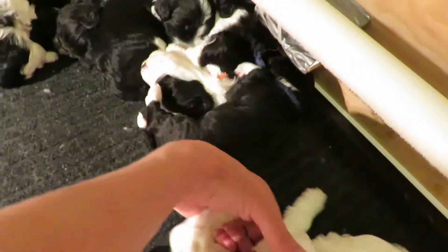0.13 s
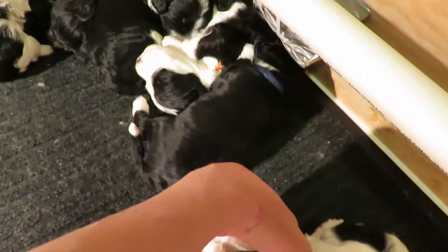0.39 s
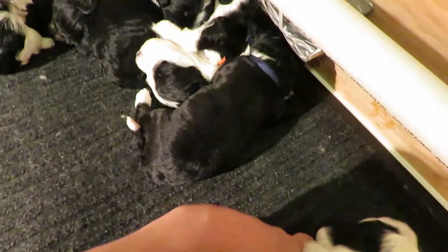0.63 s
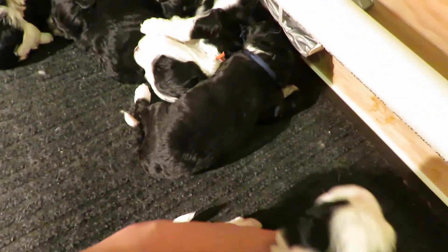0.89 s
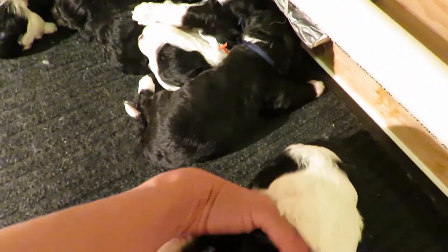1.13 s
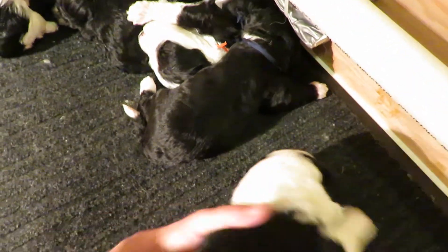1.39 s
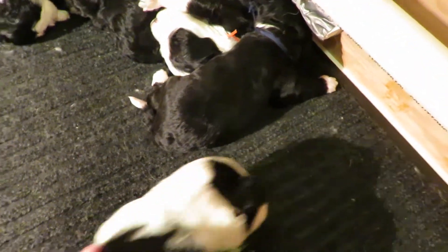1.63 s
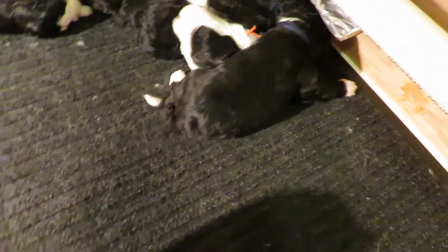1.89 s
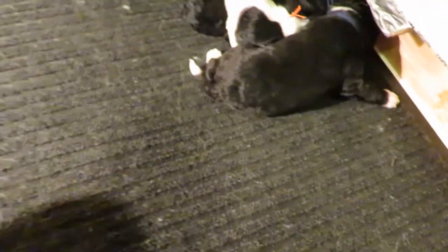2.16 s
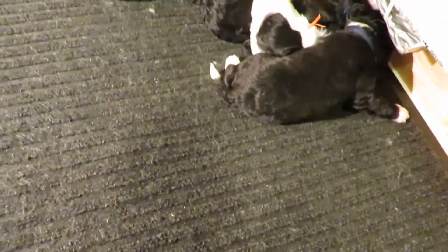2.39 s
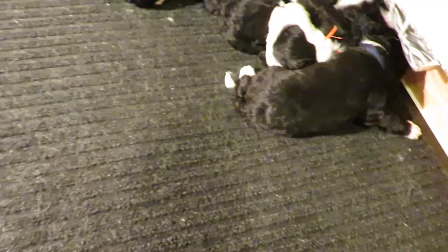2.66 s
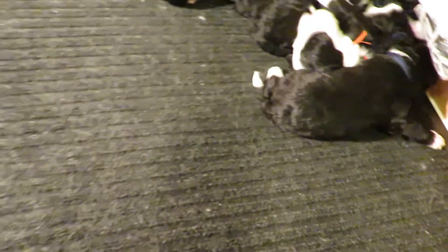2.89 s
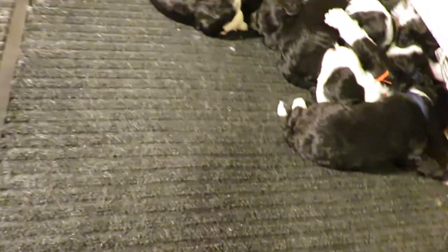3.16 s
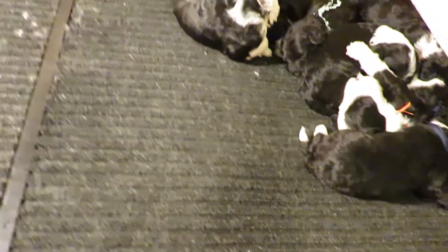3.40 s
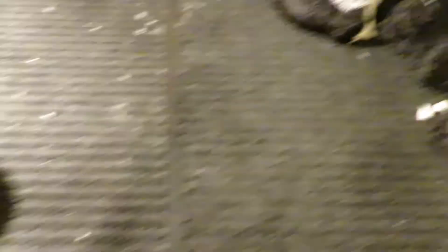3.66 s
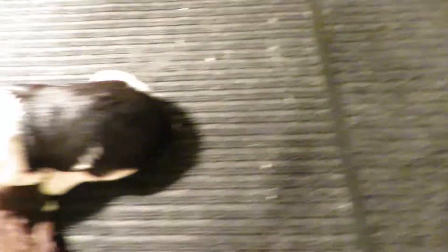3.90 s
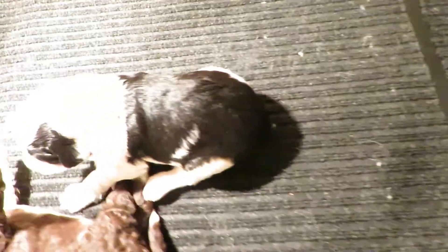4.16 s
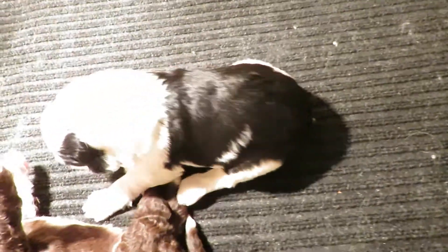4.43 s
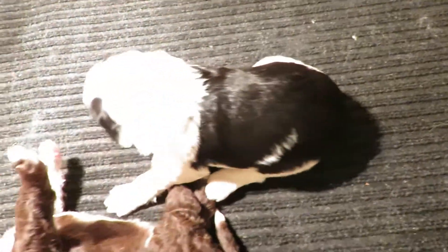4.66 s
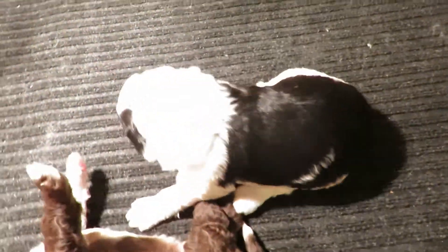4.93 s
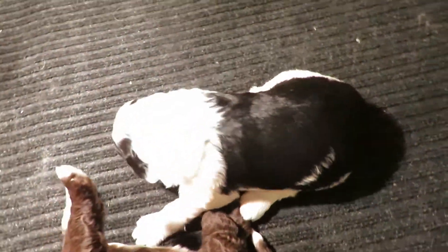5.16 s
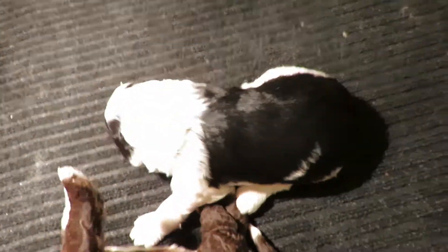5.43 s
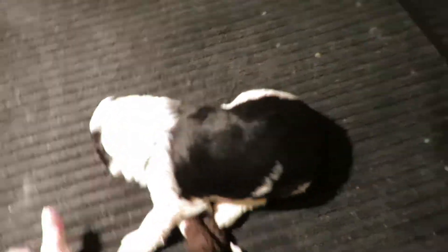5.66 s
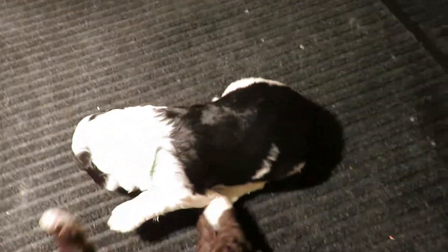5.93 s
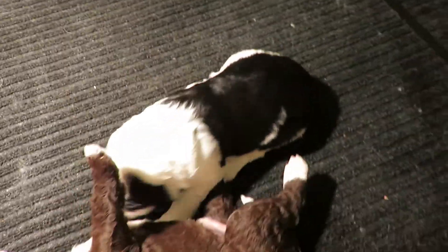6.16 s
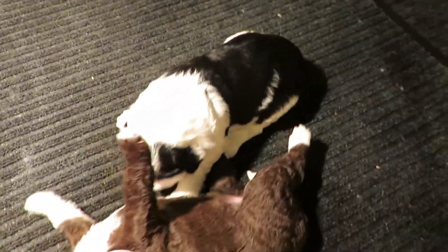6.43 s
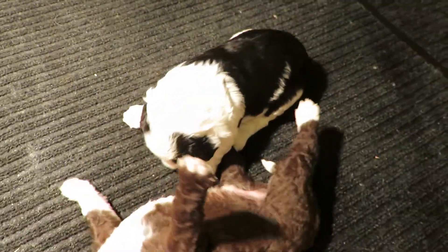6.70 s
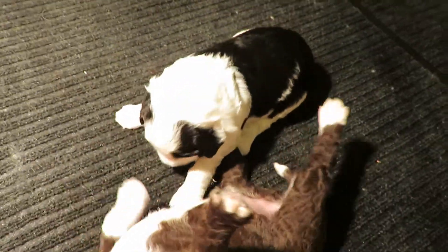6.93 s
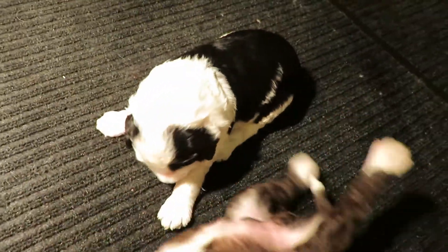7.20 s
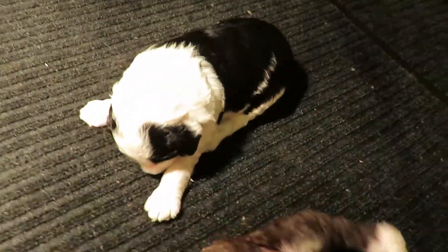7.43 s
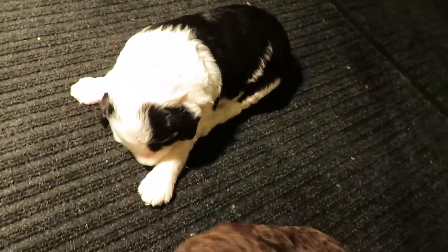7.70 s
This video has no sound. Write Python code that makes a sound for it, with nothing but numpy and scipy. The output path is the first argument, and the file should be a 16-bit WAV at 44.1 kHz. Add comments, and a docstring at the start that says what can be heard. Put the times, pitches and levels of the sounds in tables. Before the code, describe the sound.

Irregular hollow wooden knocks and thumps, soft fur rubbing and tiny claw ticks in a quiet humming room, close up.

```python
"""A wooden whelping box in a quiet room: an appliance hums near the mains rate, as steady sines over noise.
Fur and cloth drag over the ribbed mat and a sleeve rustles, as grainy noise; claws and cloth tick.
Knees, hands and puppies bump the boards, faintly, then firmly from 1.2 s: pushes and rattle excite modes.
An airy whistle swells by 2.9 s, a rub sounds a hollow note at 3.4 s, and the hardest blows fall
from 3.7 to 4.4 s. Bumps and scuffs go on from 5.4 to 6.8 s, then fade; a faint hollow rub comes at 7.6 s."""
import sys
import numpy as np
from scipy import signal
from scipy.fft import rfft, irfft, next_fast_len
from scipy.io import wavfile

SR = 44100
rng = np.random.default_rng(int(sys.argv[2]) if len(sys.argv) > 2 else 0)


def pcm_store(signal):
    """Save signal as 16-bit PCM."""
    levels = np.round(np.clip(np.atleast_2d(signal), -1, 1) * 32767)
    wavfile.write(sys.argv[1], SR, levels.astype(np.int16).T)


def attenuation_scalar(level_db):
    """Turn a level in dB into a linear amplitude multiplier (20 dB per decade)."""
    decades = np.asarray(level_db, float) / 20
    return 10 ** decades


N = 344862

# Width of diffuse sound at two close microphones: (frequency [Hz], side against mid [dB])
STEREO_WIDTH = [(60, -16), (110, -25), (200, -14), (380, -10.5), (700, -16), (1290, -7.5), (2380, -1),
                (4400, 3.5), (8120, 8.5), (15000, 18)]

# Colour of the room's noise: (frequency [Hz], relative density [dB per Hz])
ROOM_COLOUR = [(12, -35), (20, 3), (74, -5.5), (126, -3.5), (145, -14), (176, -9.5), (232, -10.5),
               (334, -11.5), (429, -9), (582, -22.5), (1110, -16.5), (1460, -22.5), (5720, -46.5),
               (12500, -81.5), (15600, -89.5)]
# Colour of the room tone that differs between the microphones: (frequency [Hz], relative density [dB per Hz])
AIR_COLOUR = [(88, -34.5), (150, -10.5), (366, -6.5), (404, -4.5), (509, -10.5), (827, -12.5), (948, -13),
              (1290, -14), (15500, -36)]
ROOM_DB, AIR_DB = -45, -54.5

# Mains and motor lines of the appliance: (frequency [Hz], level [dB])
HUM_TONES = [(44.8, -13), (59.4, -6), (120, 0), (146.4, -19), (240, -18)]
HUM_START_DB, HUM_RISE_DB_PER_S = -43.2, 0.25

# Weight shifting on the boards:
# (peak time [s], rise over 20 dB [s], fall over 20 dB [s], murmur [dB], floor rumble against murmur [dB])
WEIGHT_SHIFTS = [(0.15, 1.5, 1.1, -48, -4), (1.3, .3, .5, -54, 0), (1.61, .3, .4, -50, 6),
                 (1.74, .4, .8, -44, -10), (2.15, .4, .5, -45, -7), (2.87, 1.2, 1.2, -46, -15),
                 (3.12, .15, .3, -45, -12), (3.28, .2, .2, -38, -8), (3.46, .25, .2, -28, -14),
                 (3.66, .3, .3, -45, 8), (3.79, .2, .15, -41, -10), (3.97, .15, .15, -48, 8),
                 (4.34, .08, .12, -26, -5), (4.55, .3, .12, -36, -6), (4.68, .2, .4, -43, -8),
                 (5.35, .9, .3, -47, -12), (5.65, .4, .3, -39, -4), (5.84, .3, .25, -35, -4),
                 (6.12, .5, .4, -46, 8), (6.3, .3, .8, -42, -3), (6.58, .5, .4, -41, 9),
                 (6.72, .2, .25, -46, 8), (7.34, .6, .4, -54, 0), (7.67, .2, .3, -49, 2),
                 (7.82, .2, .2, -43, -10)]
REST_MURMUR_DB, REST_RUMBLE_DB = -62, -68
# Colour of the floor rumble: (frequency [Hz], relative density [dB per Hz])
RUMBLE_COLOUR = [(25, -36), (45, 2), (75, -1), (105, -2.5), (160, -21), (300, -61.5)]
# Ringing modes of the wooden box: (frequency [Hz], level [dB], decay by 60 dB [s])
BOX_MODES = [(63.5, -2.5, 0.13), (96.4, 6.5, .3), (131, 1, 0.19), (166.5, -2.5, 0.22), (188.8, -6, 0.29),
             (206.8, 1.5, 0.29), (245, -6, 0.29), (291.8, 1, 0.16), (305, 3, 0.12), (338.7, -2, 0.072),
             (364.8, -7, 0.33), (400.8, 1, 0.056), (445.4, 3, 0.057), (508.2, 2, 0.051), (603.5, 0, 0.14),
             (656.6, 4, 0.039), (724, 6.5, 0.04), (843, -2.5, 0.058), (960, -5.5, 0.022),
             (1099, -10.5, 0.075), (1224, -3.5, 0.015), (1416, -8, 0.064), (1718, -1, 0.034),
             (2030, -8, 0.027), (2365, -5.5, 0.01), (3106, -12.5, 0.014), (4160, -23, 0.0091)]

# Fur and cloth stroking the ribs:
# (peak time [s], rise over 20 dB [s], fall over 20 dB [s], level [dB], brightness [dB])
FUR_STROKES = [(0.09, .6, .8, -53, 0), (0.28, .4, .4, -54, -1), (0.49, .08, .2, -51, 10),
               (0.95, .1, .4, -57, 0), (1.28, .04, .3, -52, -2), (1.33, .1, .2, -55, -3),
               (1.65, .25, 1.2, -51.5, 0), (1.93, .5, .7, -52, 0), (2.18, .3, .2, -50, -6),
               (2.24, .06, .18, -44.5, 0), (2.88, 1.1, .6, -48.5, 4), (3.14, .08, .2, -57, -10),
               (3.235, .15, .05, -46, 7), (3.4, .25, .1, -37, -2), (3.455, .12, .15, -30, 4),
               (3.64, .12, .12, -48, -8), (3.705, .03, .05, -48, 8), (3.78, .3, .7, -56, 2),
               (4.17, .06, .05, -54, 3), (4.55, .3, .4, -54, 0), (5.14, .15, .15, -60, -13),
               (5.235, .07, .4, -45, 3), (5.31, .2, .25, -44.5, 3), (5.55, .2, .3, -51, 0),
               (5.73, .12, .1, -38.5, 3), (5.78, .05, .12, -37, 6), (5.89, .15, .16, -41, -2),
               (5.96, .15, .14, -45, 6), (6.2, .3, .4, -59, -3), (6.55, .6, .7, -60, -4),
               (7.22, .07, .65, -49.5, 2), (7.6, .12, .2, -57, -8), (7.72, .2, .3, -57, 0),
               (7.82, .03, .1, -63, -17)]
# Paws and knees skidding abruptly: (peak time [s], fall over 20 dB [s], level [dB], brightness [dB])
PAW_SKIDS = [(3.27, .15, -37, 7), (4.31, .13, -38, 8), (6.816, .23, -37.5, 4)]
# Colours of bright, dull and fine scuff: (frequency [Hz], relative density [dB per Hz])
BRIGHT_SCUFF_COLOUR = [(900, -26), (1500, 2.5), (1700, 4), (2500, 1), (3400, -5), (4300, -12.5),
                       (5000, -22.5), (9000, -66)]
DULL_SCUFF_COLOUR = [(250, -23), (500, 6), (900, 3), (1080, 1.5), (1200, -0.5), (1300, 1.5), (1500, -4.5),
                     (2500, -15), (5000, -76.5)]
FINE_SCUFF_COLOUR = [(2000, -24), (3300, 0.5), (4200, -1.5), (5200, -2), (7000, -9.5), (11000, -20.5),
                     (16000, -30)]
# Bright strokes trade dull scuff for fine; FINE_SHARE is dB of fine scuff per dB of brightness
DULL_DB, FINE_DB, FINE_SHARE, REST_SCUFF_DB = 3.0, -7.5, 0.3, -66
# A skid is heavy: less fine scuff than a stroke
SKID_RISE_S, SKID_FINE_DB = 0.012, -11
# Each blow slaps the mat: level against its crack, rise and fall over 20 dB, then a longer tail
SLAP_DB, SLAP_RISE_S, SLAP_FALL_S, SLAP_BRIGHT_DB = -2, 0.003, 0.035, -14
SLAP_TAIL_DB, SLAP_TAIL_S = -11, 0.26

# A sleeve brushing past: (peak time [s], rise over 20 dB [s], fall over 20 dB [s], level [dB])
SLEEVE_BRUSHES = [(0.0, .1, .6, -57.5), (0.15, .2, .2, -60), (0.39, .12, .07, -55.5), (0.5, .08, .2, -50),
                  (1.04, .7, .7, -63), (1.2, .2, .15, -62), (1.32, .3, .05, -57), (1.5, .03, .04, -49),
                  (1.63, .1, .6, -62), (1.76, .6, .16, -58), (2.09, .15, .05, -55), (2.24, .12, .22, -52.5),
                  (2.48, .07, .35, -64.5), (2.74, .09, .15, -62.5), (2.85, .15, .11, -62),
                  (2.99, .02, .03, -60), (3.07, .05, .1, -61), (3.13, .04, .1, -59), (3.41, .5, .1, -55),
                  (3.46, .1, .09, -51), (3.61, .15, .3, -59), (3.68, .2, .12, -59), (3.9, .3, .6, -70),
                  (4.15, .3, .3, -71), (4.42, .03, .07, -54), (4.66, .1, 1.2, -68), (5.12, .15, .07, -71),
                  (5.24, .08, .3, -64), (5.31, .3, .27, -59), (5.74, .1, .055, -43), (5.92, .07, .2, -51),
                  (5.97, .1, .08, -51), (6.36, .15, .12, -64), (6.49, .12, .06, -63), (6.83, .1, .08, -65),
                  (7.0, .15, .2, -68), (7.25, .6, 1.5, -68), (7.67, .7, .7, -73)]
# Colour of the sleeve's rustle: (frequency [Hz], relative density [dB per Hz])
RUSTLE_COLOUR = [(4000, -3), (6000, -2.5), (8000, -5), (12000, -7), (15500, -8), (17000, -44)]
REST_RUSTLE_DB = -85

# An airy whistle: (peak time [s], rise over 20 dB [s], fall over 20 dB [s], level [dB])
WHISTLE_SWELLS = [(0.25, 1.5, .8, -59), (2.85, .8, .5, -53), (3.62, .2, .5, -56)]
# Narrow bands of the whistle: (frequency [Hz], level [dB], decay by 60 dB [s])
WHISTLE_MODES = [(2210, 0, .022), (3235, -8, .015), (3620, -6, .012), (4580, -9, .013), (5240, -8, .012)]

# Blows on the boards: (time [s], level [dB], deep boom [dB], upper boards [dB], crack [dB]);
# the last three stand against the level
BOARD_BLOWS = [(0.081, -47.5, -14, 17, -3), (0.119, -49, 4, 10, 2), (0.877, -56.5, 8, 20, -12),
               (1.232, -28, 2, 6, -32), (1.26, -38, 1, -8, -21), (1.313, -40, -4, 2, 0),
               (1.499, -28.5, -15, -14, 4), (1.513, -22.5, -7, -2, -28), (1.558, -31, -13, -2, -30),
               (1.704, -39, 3, 4, -12), (2.079, -40, 1, -3, -6), (2.097, -37, 3, 6, -16),
               (2.116, -31, -10, 5, -14), (2.139, -41, -12, 7, -3), (2.179, -44, -9, 9, -1),
               (3.271, -33, -4, -7, -13), (3.72, -7.5, -23.5, -13, -26), (3.769, -32, -4, 3, -16),
               (3.831, -41, 3.5, 4, -11.5), (3.927, -19.5, -14, -1.5, -22), (3.984, -41, -14, -15, -13),
               (4.188, -15, -15, -6, -15), (4.244, -2.5, -34, -12, -24), (4.266, -14, -13, -16, -22),
               (4.301, -18.5, -8.5, -4, -16), (4.378, -16, -8, -4, -11.5), (4.387, -11.5, -9, -1, -5),
               (4.413, -36, -11, -15, -14), (4.446, -24, -10, 1, -4), (4.469, -31.5, -10, 12, -14),
               (4.529, -41.5, 3, -5, -8), (5.053, -47, -8, 17, -8), (5.441, -16.5, -0.5, -2, -15),
               (5.477, -11.5, -14, -8, -12), (5.493, -33, 11, -5, -22), (5.758, -14, -20, 2, -3),
               (5.767, -9, -17, -18, -5), (5.801, -24, -2, -4, -3), (5.881, -18.5, -9, 3, -11),
               (5.949, -37, -2, -11, -10), (6.094, -18, -15.5, -1, -22), (6.14, -31, -11, -8, -23),
               (6.302, -16.5, -24, -5.5, -36), (6.481, -23.5, -12, -5, -32), (6.511, -30, 8, -20, -22),
               (6.577, -31.5, 5.5, -21, -22), (6.653, -34, -5, 3, -12), (6.684, -29, -10.5, -16, -30),
               (6.811, -43, 5, 8, -4), (7.355, -45, 13, -8, -5), (7.399, -51, 2, -1, -5),
               (7.771, -45, 11, -6, -4)]
# Where deep boom, level, upper boards and crack apply: (frequency [Hz])
BLOW_ANCHORS = [100, 205, 305, 1600]
# The contact starts before the boom peaks; contact and rattle times hold at 200 Hz
LEAD_S, CONTACT_S, RATTLE_S, RATTLE_DB = 0.003, 0.0035, 0.029, -2.5
ECHO_T60_S, ECHO_DB, ECHO_SIDE_DB = 0.41, -8.5, -22.5

# Small ticks of claws and cloth: (time [s], level [dB], pitch [Hz])
CLAW_TICKS = [(0.145, -34, 4560), (0.377, -38, 10800), (0.401, -34, 12200), (0.496, -38, 11000),
              (0.7916, -54, 9000), (0.9396, -54, 9000), (1.277, -41, 6000), (1.289, -38, 5500),
              (1.316, -38, 5600), (1.331, -41, 5560), (1.497, -34, 5000), (1.507, -29.5, 5200),
              (1.983, -46, 9000), (2.079, -42, 5000), (2.226, -38, 8000), (2.26, -42, 10000),
              (2.277, -34.5, 11000), (2.302, -39, 11000), (2.7526, -33.5, 5500), (2.994, -38, 7500),
              (3.128, -55, 8000), (3.574, -44, 11500), (3.5795, -37, 10000), (3.6, -42, 10500),
              (3.61, -41.5, 11000), (3.62, -39.5, 11600), (3.674, -46, 8500), (3.6985, -26, 3440),
              (4.308, -44, 4000), (4.414, -44, 8100), (4.526, -46, 5830)]

# Rubs that set a hollow note of the box sounding:
# (peak time [s], rise over 20 dB [s], fall over 20 dB [s], level [dB])
HOLLOW_RUBS = [(3.425, .025, .11, -29), (7.615, .04, .12, -42)]
# Modes of the hollow note: (frequency [Hz], level [dB], decay by 60 dB [s])
HOLLOW_NOTE = [(1080, 2, 0.053), (1230, -2, 0.055), (1950, -12, .02)]


def rms_one(x):
    """Scale to unit rms."""
    return x / np.sqrt(np.mean(x ** 2) + 1e-20)


def colour(x, points):
    """Colour without phase shift by a spectrum drawn in dB over log frequency."""
    size = next_fast_len(len(x))
    hz = np.maximum(np.arange(size // 2 + 1) * SR / size, 1)
    point_hz, point_db = np.transpose(points)
    gain_db = np.interp(np.log(hz), np.log(point_hz), point_db)
    return irfft(rfft(x, size) * attenuation_scalar(gain_db), size)[:len(x)]


def drift(rate):
    """Slow random wander: straight lines between random knots, `rate` knots a second."""
    knots = rng.standard_normal(800)
    return np.interp(np.arange(N) * rate / SR, np.arange(800), knots)


def ring(x, hz, t60):
    """A damped resonator: a unit click sets a sine of height 1 ringing."""
    radius = attenuation_scalar(-60 / (t60 * SR))
    angle = 2 * np.pi * hz / SR
    poles = [1, -2 * radius * np.cos(angle), radius * radius]
    return signal.lfilter([0, np.sin(angle)], poles, x + 1e-18)


def spread(mid, other, side_db):
    """Left and right from a mid signal and another whose treble makes the width."""
    side = attenuation_scalar(side_db) * colour(other, STEREO_WIDTH)
    return np.array([mid + side, mid - side])


def grains(grit_db):
    """Noise whose samples have uneven sizes, as fibres catching and letting go."""
    size_db = grit_db * np.minimum(rng.exponential(1, N), 5)
    return rms_one(rng.standard_normal(N) * attenuation_scalar(size_db))


def swells(s, rise_s, fall_s, peak_db, rest_db):
    """Level in dB of events with straight dB slopes, their powers added to a resting level."""
    t = np.arange(0, N + 44, 44) / SR   # one point every 44 samples
    late = t - s[:, None]
    drop = np.maximum(-late / np.c_[rise_s], late / np.c_[fall_s])
    db = (peak_db + 0 * s)[:, None] - 20 * drop
    power = np.sum(attenuation_scalar(2 * np.maximum(db, -200)), axis=0) + attenuation_scalar(2 * rest_db)
    return np.interp(np.arange(N) / SR, t, 10 * np.log10(power))


def friction(spectrum, level_db, grit_db, flicker_db, side_db):
    """Grainy rubbing, flickering as the stroke catches."""
    gain = attenuation_scalar(level_db + flicker_db * drift(30))
    mid, other = (gain * rms_one(colour(grains(grit_db), spectrum)) for _ in range(2))
    return spread(mid, other, side_db)


def room_tone():
    """Steady air and microphone hiss over a low motor rumble, all coloured noise."""
    mid = attenuation_scalar(ROOM_DB) * rms_one(colour(rng.standard_normal(N), ROOM_COLOUR))
    side = attenuation_scalar(AIR_DB) * rms_one(colour(rng.standard_normal(N), AIR_COLOUR))
    return np.array([mid + side, mid - side])


def hum():
    """Mains and motor lines as sines, each wavering a little while all slowly rise."""
    t = np.arange(N) / SR
    tones = np.zeros(N)
    for hz, db in HUM_TONES:
        tones += attenuation_scalar(db + 0.51 * drift(4.4)) * np.sin(2 * np.pi * hz * t)
    return np.sqrt(2) * attenuation_scalar(HUM_START_DB + HUM_RISE_DB_PER_S * t) * tones


def floor_rumble():
    """Shifting weight makes the floor rumble: low noise that swells with each lean."""
    s, rise_s, fall_s, murmur_db, deep_db = np.transpose(WEIGHT_SHIFTS)
    level_db = swells(s, rise_s, fall_s, murmur_db + deep_db, REST_RUMBLE_DB)
    return friction(RUMBLE_COLOUR, level_db, grit_db=0.5, flicker_db=-1.5, side_db=-15.0)


def boards_dragged():
    """Uneven friction under shifting weight keeps the lower modes murmuring."""
    s, rise_s, fall_s, murmur_db, _ = np.transpose(WEIGHT_SHIFTS)
    weight_db = swells(s, rise_s, fall_s, murmur_db, REST_MURMUR_DB)
    rub = grains(3.1) * attenuation_scalar(2.9 * drift(25))
    murmur = sum(attenuation_scalar(level_db) * ring(rub, hz, t60) for hz, level_db, t60 in BOX_MODES[3:14])
    return attenuation_scalar(weight_db) * rms_one(murmur)


def scuffing():
    """Strokes, skids and the slaps of blows rub the mat, heard as bright, dull and fine scuff."""
    skids = [(s, SKID_RISE_S, fall_s, db, bright_db) for s, fall_s, db, bright_db in PAW_SKIDS]
    s, rise_s, fall_s, db, bright_db = np.transpose(list(FUR_STROKES) + skids)
    heavy_db = SKID_FINE_DB * (np.arange(len(s)) >= len(FUR_STROKES))

    hit_s, hit_db, _, _, crack_db = np.transpose(BOARD_BLOWS)
    slap_db = hit_db + crack_db + SLAP_DB
    slap = swells(hit_s, [SLAP_RISE_S], [SLAP_FALL_S], slap_db, -200)
    tail = swells(hit_s, [SLAP_RISE_S], [SLAP_TAIL_S], slap_db + SLAP_TAIL_DB, -200)
    slap_power = attenuation_scalar(2 * slap) + attenuation_scalar(2 * tail)

    bright_power = attenuation_scalar(2 * swells(s, rise_s, fall_s, db, REST_SCUFF_DB))
    bright_power += slap_power * attenuation_scalar(2 * SLAP_BRIGHT_DB)
    dull_db = swells(s, rise_s, fall_s, db + DULL_DB - bright_db, REST_SCUFF_DB + DULL_DB)
    dull_power = attenuation_scalar(2 * dull_db) + slap_power
    fine_peak_db = db + FINE_DB + FINE_SHARE * bright_db + heavy_db
    fine_db = swells(s, rise_s, fall_s, fine_peak_db, REST_SCUFF_DB + FINE_DB)

    bright = friction(BRIGHT_SCUFF_COLOUR, 10 * np.log10(bright_power), grit_db=4.0, flicker_db=1.06, side_db=-9.0)
    dull = friction(DULL_SCUFF_COLOUR, 10 * np.log10(dull_power), grit_db=4.0, flicker_db=2.4, side_db=-5.0)
    fine = friction(FINE_SCUFF_COLOUR, fine_db, grit_db=3.5, flicker_db=1.3, side_db=-6.0)
    return bright + dull + fine


def sleeve_rustle():
    """A sleeve near the microphones: treble friction that swells with each brush."""
    level_db = swells(*np.transpose(SLEEVE_BRUSHES), REST_RUSTLE_DB)
    return friction(RUSTLE_COLOUR, level_db, grit_db=4.0, flicker_db=0.5, side_db=-10.0)


def airy_whistle():
    """Noise ringing in a few narrow bands, swelling and fading."""
    air = rng.standard_normal((2, N)) * attenuation_scalar(2.0 * drift(20))
    bands = sum(attenuation_scalar(db) * rms_one(ring(air, hz, t60)) for hz, db, t60 in WHISTLE_MODES)
    level_db = swells(*np.transpose(WHISTLE_SWELLS), -200)
    return spread(*(attenuation_scalar(level_db) * bands), -8.0)


def blows():
    """A soft contact, then loose boards rattling, both feeding modes with strengths new at every blow."""
    s, hit_db, deep_db, upper_db, crack_db = np.transpose(BOARD_BLOWS)
    at = np.round((s - LEAD_S) * SR).astype(int)
    anchor_db = hit_db[:, None] + np.c_[deep_db, 0 * s, upper_db, crack_db]
    chance_db = rng.normal(0, 0.63, (len(s), len(BOX_MODES)))
    t = np.arange(SR // 4) / SR
    out = np.zeros(N)
    for k, (hz, level_db, t60) in enumerate(BOX_MODES):
        clicks = np.zeros(N)
        here_db = [np.interp(np.log(hz), np.log(BLOW_ANCHORS), row) for row in anchor_db]
        clicks[at] = attenuation_scalar(here_db + chance_db[:, k] + level_db - 2.5)
        # low modes are pushed for longer than high ones; neighbours in opposite directions
        push = np.hanning(3 + int(CONTACT_S * SR * 200 / hz))
        force = np.convolve(clicks, push / push.sum())[:N] * (-1) ** k
        # the rattle dulls as it dies
        fade = np.exp(-t / RATTLE_S * (hz / 200) ** 0.35)
        fade /= np.sqrt(np.sum(fade ** 2))
        rattle = signal.fftconvolve(clicks, fade)[:N] * rng.standard_normal(N)
        force += attenuation_scalar(RATTLE_DB) * rattle
        out += ring(force, hz, t60)
    return out


def echo(x):
    """The room answers with dying noise; a quarter-cycle copy in the side offsets left and right in phase."""
    t = np.arange(SR) / SR
    tails = rng.standard_normal((2, SR)) * attenuation_scalar(-60 * t / ECHO_T60_S) * (1 - np.exp(-t / 0.0027))
    tails /= np.sqrt(np.sum(tails ** 2, axis=1, keepdims=True))
    # the lows stay in the box
    high_pass = signal.butter(2, 380, "high", fs=SR, output="sos")
    tails[0] = signal.sosfilt(high_pass, tails[0])
    mid, other = (signal.fftconvolve(x, tail)[:N] for tail in tails)
    # the direct sound reaches one microphone a little early, drawn as a phase turn
    turned = np.imag(signal.hilbert(x, next_fast_len(N)))[:N]
    return spread(x + attenuation_scalar(ECHO_DB) * mid, other + attenuation_scalar(15.0) * turned, ECHO_SIDE_DB)


def ticks():
    """Each tick rings a few cycles at its own pitch over a bright snap."""
    out = np.zeros((2, N + SR))
    t = np.arange(400) / SR
    snaps = rng.standard_normal((len(CLAW_TICKS), 2, 400))
    for (s, level_db, hz), snap in zip(CLAW_TICKS, snaps):
        tone = np.sin(2 * np.pi * hz * t) * np.exp(-t / 0.0008)
        crack = attenuation_scalar(-14) * np.diff(snap, prepend=0) * np.exp(-t / 0.00047)
        at = round(s * SR)
        out[:, at:at + 400] += attenuation_scalar(level_db) * (tone + crack)
    return spread(out[0, :N], out[1, :N], -10.5)


def hollow_rub():
    """Rough friction through the hollow modes."""
    level_db = swells(*np.transpose(HOLLOW_RUBS), -200)
    rub = np.array([grains(3.5), grains(3.0)])
    note = sum(attenuation_scalar(db) * rms_one(ring(rub, hz, t60)) for hz, db, t60 in HOLLOW_NOTE)
    return spread(*(attenuation_scalar(level_db) * note), -14.0)


def scene():
    """Everything at the microphones."""
    steady = room_tone() + hum()
    rubbing = floor_rumble() + scuffing() + sleeve_rustle() + airy_whistle()
    box = echo(boards_dragged() + blows())
    return steady + rubbing + box + ticks() + hollow_rub()


def low_pass(x):
    """Removes everything above the highest recorded frequency."""
    return signal.sosfilt(signal.butter(12, 15750, fs=SR, output="sos"), x)


def record(dry):
    """Small microphones lose the deepest bass and the very top, and peaks are rounded."""
    low_cut = signal.butter(4, 34, "high", fs=SR, output="sos")
    high_cut = signal.butter(6, 14500, fs=SR, output="sos")
    heard = signal.sosfilt(high_cut, signal.sosfilt(low_cut, dry))
    mix = 1.046 * np.tanh(heard / 1.156)
    return low_pass(mix)


dry = scene()
out = record(dry)
pcm_store(out)
```